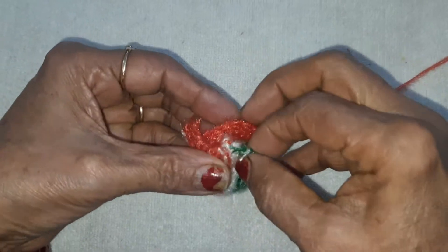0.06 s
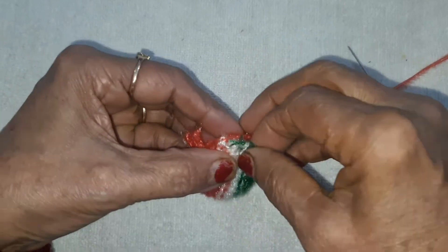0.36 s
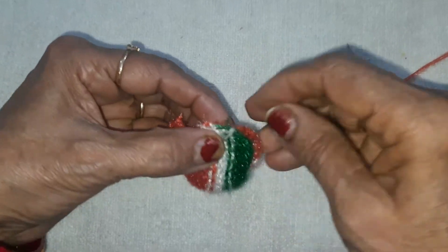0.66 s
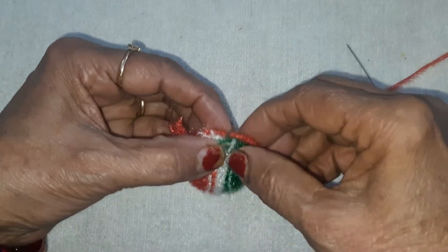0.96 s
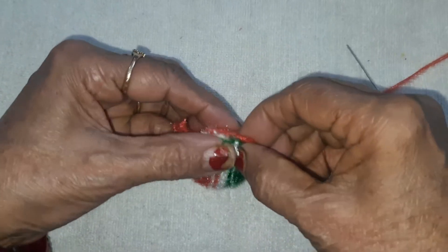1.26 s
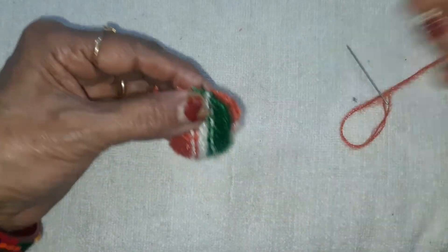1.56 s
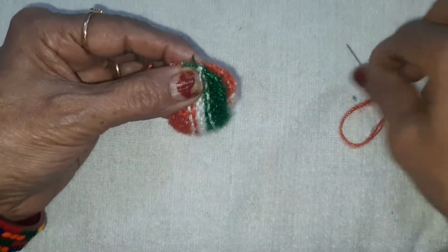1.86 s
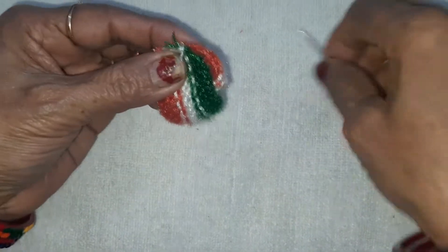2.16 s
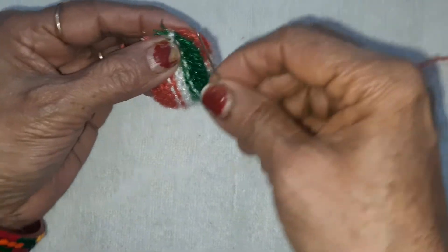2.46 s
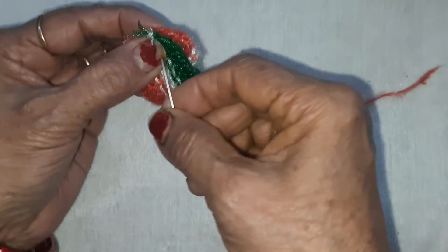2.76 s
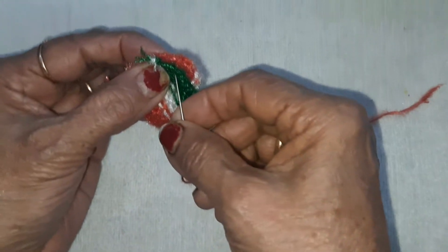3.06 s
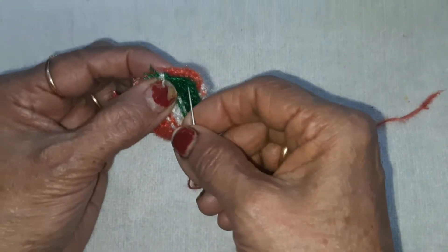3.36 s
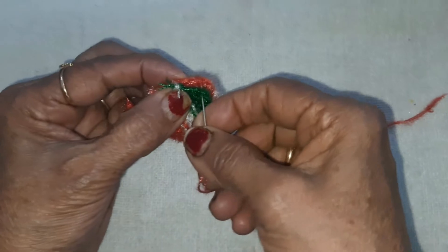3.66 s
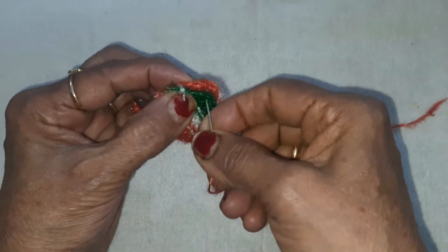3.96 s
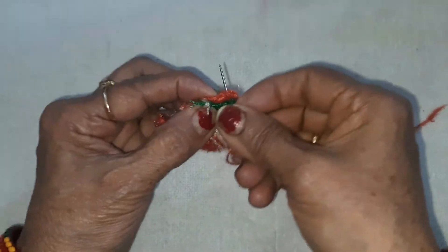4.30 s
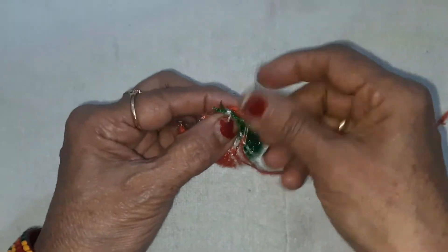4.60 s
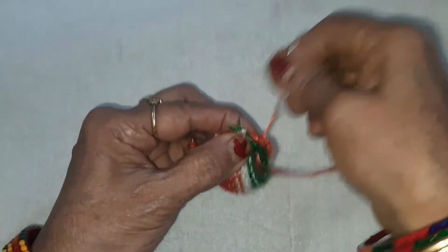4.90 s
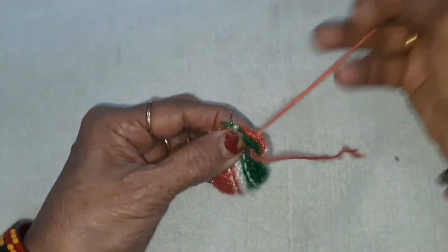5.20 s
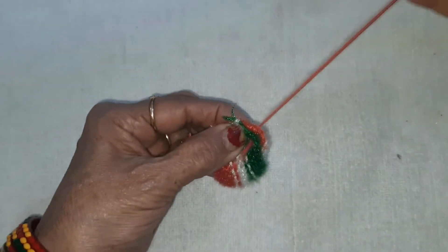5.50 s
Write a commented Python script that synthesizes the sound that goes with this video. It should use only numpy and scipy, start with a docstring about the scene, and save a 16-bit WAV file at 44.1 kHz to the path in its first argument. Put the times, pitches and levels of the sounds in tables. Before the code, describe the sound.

Glass bangles clink brightly on the wrists of someone sewing a small woollen piece, close to the microphone. Irregular clinks and short rattles come first, with forearms softly rubbing and bumping on a cloth-covered table. After a lull, yarn hisses through the wool and the bangles chatter again, including one hard, ringing clash that briefly overloads the microphone. A small room hums quietly underneath.

```python
"""Glass bangles clink and rattle on the wrists of hands sewing a small woollen piece in a small room.
Each touch is a brief crack and a bright ring of glass; one hard clash overloads the close microphone.
Yarn hisses through the wool, fingers brush, and forearms rub and bump on the cloth-covered table.
Underneath, the room hums, and a faint thin tone comes and goes for the first two seconds."""
import sys
import numpy as np
from scipy import signal
from scipy.fft import rfft, irfft, next_fast_len
from scipy.io import wavfile
from scipy.ndimage import uniform_filter1d, map_coordinates

SR = 44100
rng = np.random.default_rng(int(sys.argv[2]) if len(sys.argv) > 2 else 0)


def unload_wav(signal):
    """Save mono or channel-first audio to the path in sys.argv[1] as 16-bit WAV at rate SR, clipped to [-1, 1]."""
    wavfile.write(
        sys.argv[1],
        SR,
        np.round(np.clip(np.atleast_2d(signal).T, -1, 1) * 32767).astype(np.int16),
    )


N = 248724
TIME_S = np.arange(N) / SR


def amp(db):
    return 10 ** (np.asarray(db) / 20)


def unit_rms(x):
    return x / np.sqrt(np.mean(x ** 2) + 1e-20)


def along(points, hz):
    """Read (freq_hz, value) points on a log frequency axis."""
    freqs, values = np.transpose(points)
    return np.interp(np.log(hz + 1), np.log(freqs + 1), values)


def wobble(rate_hz):
    """A smooth random curve with rate_hz knots a second."""
    knots = rng.standard_normal(int(N * rate_hz / SR) + 4)
    return map_coordinates(knots, [TIME_S * rate_hz])


def swells(rows):
    """Bell-shaped humps of gain from (centre_s, width_s, level_db) rows."""
    return sum(amp(db) * np.exp(-2 * ((TIME_S - centre) / width) ** 2) for centre, width, db in rows)


def decay(t, t60):
    """An envelope that loses 60 dB in t60 seconds."""
    return np.exp(-np.log(1000) * t / t60)


def filtered(x, response):
    """Equalise x with a gain given as a function of frequency."""
    n = x.shape[-1]
    padded = next_fast_len(n + 8192)
    return irfft(rfft(x, padded) * response(np.fft.rfftfreq(padded, 1 / SR)), padded)[..., :n]


def panned(pan_db):
    """Left and right gains for a level difference; positive is left."""
    return amp(np.array([[.5], [-.5]]) * pan_db)


def noise(spectrum, correlation, pan):
    """Stereo noise with colour, width and pan set by frequency; its mono mix has rms 1."""
    def mid_side_gains(hz):
        angle = np.arccos(np.clip(along(correlation, hz), -1, 1)) / 2
        return amp(along(spectrum, hz)) * [np.cos(angle), np.sin(angle)]
    mid, side = filtered(rng.standard_normal((2, N)), mid_side_gains)
    pair = filtered(np.array([mid + side, mid - side]), lambda hz: panned(along(pan, hz)))
    return pair / np.std(pair.mean(0))


def add(track, start_s, sound):
    """Mix a stereo sound into the track."""
    part = track[:, max(round(start_s * SR), 0):][:, :sound.shape[1]]
    part += sound[:, :part.shape[1]]


# Colour of the room's air: freq_hz, gain_db
AIR_SPECTRUM = [(15, -52), (25, -18.5), (43, -9.5), (129, -2.5), (198, -10), (282, -9), (410, -13.5),
                (495, -15.5), (684, -17.5), (895, -20.5), (1710, -24), (3500, -29), (6000, -31),
                (8300, -27.5), (10300, -32.5), (13000, -27), (15500, -28.5)]
# How alike the air is left and right: freq_hz, correlation
AIR_CORRELATION = [(60, 0.41), (150, 0.77), (380, 0.16), (950, -0.036), (2380, 0.071), (5980, -0.24),
                   (15000, 0.07)]
# Balance of the air: freq_hz, pan_db
AIR_PAN = [(60, 0.5), (240, 0.5), (950, 1.5), (3770, 1), (15000, -1.5)]
# Steady hum tones: pitch_hz, level_db
HUM_TONES = [(98.5, -65), (699.8, -85)]


def room_tone():
    """A bed of bass-heavy hiss and hum, both drifting gently in level."""
    air = amp(-57.2 + .45 * wobble(5)) * noise(AIR_SPECTRUM, AIR_CORRELATION, AIR_PAN)
    hum = sum(amp(db + 1.8 * wobble(2.94)) * np.sin(2 * np.pi * hz * TIME_S + .5 * wobble(5.5))
              for hz, db in HUM_TONES)
    return air + hum * panned(1)


# Steady rub of the resting arms: time_s, relative_db
ARM_REST = [(0, -47.5), (2.05, -50.5), (2.25, -52.5), (3.1, -57), (3.4, -62.5), (5.64, -59)]
# An arm shifts on the table: centre_s, width_s, relative_db
ARM_SHIFTS = [(0.125, 0.084, -48.5), (0.52, 0.1, -46), (0.82, 0.098, -49.5), (1.37, 0.12, -45),
              (1.92, 0.18, -52.5), (2.67, 0.13, -47), (2.87, 0.061, -46.5), (3.04, 0.098, -45),
              (4.28, 0.15, -60)]
# Low rumble of the rub: freq_hz, gain_db
RUB_SPECTRUM = [(15, -47), (25, -25.5), (102, -0.5), (151, -6.5), (189, -16), (287, -15), (369, -26),
                (467, -26), (530, -56.5), (700, -29), (910, -73), (1540, -120)]
# Soft bumps on the table: start_s, relative_db
TABLE_BUMPS = [(0.699, -43.5), (1.956, -34), (1.969, -44), (2.663, -45)]
# Dull body of a bump: freq_hz, gain_db
THUD_SPECTRUM = [(60, -2), (130, 3), (230, -2), (360, 0), (500, -18), (1500, -34), (3000, -30), (8000, -69)]


def arms():
    """Forearms rub on the padded table, louder whenever they shift, and now and then bump it."""
    effort = amp(np.interp(TIME_S, *np.transpose(ARM_REST))) + swells(ARM_SHIFTS)
    rub = noise(RUB_SPECTRUM, correlation=[(30, 0.69), (100, 0.98), (500, 0.3)], pan=[(100, 5)])
    out = amp(-4) * effort * rub
    t = np.arange(SR // 5) / SR
    envelope = decay(t, 0.15) * (1 - np.exp(-t / 0.002))
    for start_s, db in TABLE_BUMPS:
        thud = filtered(rng.standard_normal(len(t)), lambda hz: amp(along(THUD_SPECTRUM, hz)))
        add(out, start_s, amp(db - 1) * panned(2) * unit_rms(thud) * envelope)
    return out


# Soft pulses of the thin tone: centre_s, level_db
TONE_PULSES = [(0.115, -73), (0.47, -73.5), (0.62, -75), (0.78, -76), (1.08, -82), (1.33, -71),
               (1.57, -74.5), (1.73, -75), (1.87, -71.5)]


def thin_tone(pitch_hz=2373, pulse_s=0.053, bed_db=-82, end_s=1.95):
    """A faint, wavering tone off to the left swells unevenly, lingers between pulses, then stops."""
    hz = pitch_hz + 4 * wobble(14)
    bed = amp(bed_db) * (TIME_S < end_s)
    pulses = swells([(centre_s, pulse_s, db) for centre_s, db in TONE_PULSES])
    return (bed + pulses) * np.sin(2 * np.pi * np.cumsum(hz) / SR) * panned(19)


# Finger brushes: centre_s, width_s, peak_hz, level_db
FINGER_BRUSHES = [(0.475, 0.13, 2240, -67), (1.452, 0.08, 1950, -69), (2.478, 0.064, 2130, -64.5),
                  (3.525, .1, 990, -71), (3.723, 0.15, 1440, -68.5), (4.492, 0.028, 1020, -63.5)]


def fingers():
    """Fingers brush skin and cloth, each pass a soft, dull swell of grainy noise."""
    out = np.zeros((2, N))
    for centre_s, width_s, hz, db in FINGER_BRUSHES:
        band = [(hz / 4, -35), (hz * 0.99, -6), (hz, 0), (hz * 0.86, -6), (hz * 3, -30)]
        out += swells([(centre_s, width_s, db)]) * noise(band, correlation=[(hz, .4)], pan=[(hz, 2)])
    grain = unit_rms(amp(2.7 * wobble(200)))
    return out * grain


# Yarn drawn through the wool: centre_s, width_s, level_db
YARN_STROKES = [(0.61, 0.049, -58.5), (1.425, .04, -56.5), (4.311, 0.029, -55), (4.342, 0.054, -57),
                (4.41, 0.05, -60.5), (4.593, 0.061, -59), (5.12, 0.34, -52.5)]
# Bright hiss of the fibres: freq_hz, gain_db
WOOL_SPECTRUM = [(1000, -14), (2000, -8), (4500, -9), (8000, 1.5), (12000, -2), (15500, 0.5)]


def wool():
    """Fibres catch and slip under each stroke, giving a grainy hiss."""
    grain = amp(2.4 * wobble(390))
    hiss = noise(WOOL_SPECTRUM, correlation=[(4000, 0.32)], pan=[(4000, 0.56)])
    return swells(YARN_STROKES) * unit_rms(grain * hiss)


# Ringing modes of a glass bangle: pitch_hz, relative_db, base_t60_s
GLASS_MODES = [(1512, -16, 0.035), (2895, -13, 0.051), (4139, -4, 0.079), (4344, 2.5, 0.038),
               (4680, -13, 0.13), (5370, -9, 0.017), (6470, -9, 0.042), (6700, -17.5, 0.052),
               (7445, -6.5, 0.052), (7890, -3.5, 0.07), (8322, -0.5, 0.039), (8760, -2, 0.043),
               (9290, -2, 0.023), (9950, -6, 0.024), (11100, -7.5, 0.031), (11800, -7, 0.039),
               (11940, -7.5, 0.019), (12544, -2, 0.044), (12870, -3, 0.028), (13340, 1.5, 0.026),
               (14020, -10.5, 0.023), (14700, 10, 0.023), (15300, -5.5, 0.028)]
# Crack of glass on glass: freq_hz, gain_db
CRACK_SPECTRUM = [(1000, -5), (3300, -13), (6000, -3.5), (8000, 5.5), (12000, -5.5), (15500, -3.5)]


def glass(colour, damping, crack_db, crack_t60, scatter_db, detune_hz):
    """One contact: a brief crack, and modes that reach each channel at their own strength and phase."""
    t = np.arange(SR // 14) / SR
    hz, db, t60 = np.transpose(GLASS_MODES)
    strength = amp(db + colour(hz) + scatter_db * rng.standard_normal((2, len(hz))))
    pitch = hz + detune_hz * rng.standard_normal(len(hz))  # no two bangles are quite alike
    phase = rng.uniform(0, 2 * np.pi, (2, len(hz)))
    modes = np.exp(2j * np.pi * pitch[:, None] * t) * decay(t, t60[:, None] / damping)
    ring = ((strength * np.exp(1j * phase)) @ modes).imag
    crack = filtered(rng.standard_normal((2, len(t))),
                     lambda f: amp(along(CRACK_SPECTRUM, f) + colour(f)))
    attack = 1 - np.exp(-t / 0.00012)
    return (ring + amp(crack_db) * crack * decay(t, crack_t60)) * attack


# Reverb time of the small room: freq_hz, t60_s
ROOM_DECAY = [(300, 0.63), (4000, 0.3), (8000, 0.28), (15000, 0.1)]


def in_room(sound, early_db, tail_db, early_t60):
    """Quick echoes off table and arms follow the direct sound, then the room's darkening tail."""
    hz, frame_s, bands = signal.stft(rng.standard_normal((2, SR // 3)), SR, nperseg=256)
    fade = amp(-60 * frame_s / along(ROOM_DECAY, hz)[:, None])
    tail = signal.istft(bands * fade, SR, nperseg=256)[1]
    t = np.arange(tail.shape[1]) / SR
    tail *= 1 - np.exp(-t / 0.013)
    early = rng.standard_normal(tail.shape) * decay(t, early_t60) * (t > .002)
    impulse = amp(early_db) * early / np.linalg.norm(early[0])
    impulse += amp(tail_db) * tail / np.linalg.norm(tail[0])
    impulse[:, 0] += 1  # direct sound
    return signal.fftconvolve(sound, impulse, axes=1)


def clink(level_db, lead_hz, top_db):
    """One clink in the room: harder contacts are brighter, and the place of touch favours one mode."""
    force_db = level_db + 34  # zero for a firm contact
    low_db, mid_db = -15 - 0.33 * force_db, -10.5 - 0.2 * force_db
    tilt = [(4900, low_db), (7000, mid_db), (9500, mid_db), (11000, 0), (13400, 0), (14200, top_db)]
    near_lead = lambda hz, width_hz: np.exp(-((hz - lead_hz) / width_hz) ** 2)
    colour = lambda hz: along(tilt, hz) + 12 * near_lead(hz, 450) - 2 * near_lead(hz, 1100)
    ring = glass(colour, damping=1.33, crack_db=4, crack_t60=0.03, scatter_db=4.5, detune_hz=24.1)
    sound = in_room(ring, early_db=0, tail_db=-8.5, early_t60=0.054)
    return amp(level_db) * sound / np.std(sound[:, :SR // 100])  # the first 10 ms set the level


# Bangle hits, with a shelf on the top octave's upper modes: start_s, level_db, lead_hz, top_db, pan_db
BANGLE_CLINKS = [(0.6729, -45, 8600, -9, -3), (0.6865, -40.5, 8400, 3, -2), (0.7146, -23, 8100, -9, 1),
                 (0.7542, -41, 4200, -16, 6), (0.821, -51.5, 4200, -13, 2), (0.983, -57.5, 4200, -16, 5),
                 (1.184, -49, 7650, -20, 2), (1.2146, -50.5, 8280, -18, 6), (1.5771, -41, 8050, -16, 3),
                 (1.6206, -32.5, 7600, -9, -3.5), (1.6362, -37, 7360, -12, -3), (1.7857, -30, 8570, -4, 6),
                 (1.8115, -35, 4260, -12, 1.5), (1.937, -30, 13000, -18, 3), (2.167, -51.5, 7700, -12, -2),
                 (2.2936, -31.5, 7940, -20, 2.5), (2.3238, -32.5, 8100, -18, 2.5),
                 (2.395, -43, 8370, -13, 4), (2.6439, -24.5, 8150, -12, 4), (2.6483, -29.5, 4120, -13, 3),
                 (2.6641, -30, 8310, -8, 0), (2.9662, -40, 8040, -8, 0), (4.2238, -56, 8000, -13, 0),
                 (4.6308, -41.5, 7460, -12.5, -4), (4.696, -36, 7430, -15, 0), (4.808, -24, 13290, -27, 2),
                 (4.9775, -26, 8440, -12, 0), (5.035, -28.5, 7640, -20, 2.5),
                 (5.1472, -34.5, 8200, -12, 1.5), (5.169, -36, 12770, -13, -1),
                 (5.2019, -24.5, 8340, -9, -1), (5.3229, -35.5, 8200, -19.5, -2),
                 (5.3467, -27, 7400, -11, -3), (5.3868, -41.5, 8050, -25, 1), (5.4097, -36, 7200, -18, -4),
                 (5.5718, -36, 8420, -21, 7.5), (5.5954, -36, 8900, -22, 1)]


def bangles(settle_s=0.08, settle_loss_db=20, fade_db_per_s=110):
    """Bangles clink as the yarn is drawn, each hit trailed by two faint, duller touches as they settle."""
    out = np.zeros((2, N))
    settle_delays = settle_s * rng.random((len(BANGLE_CLINKS), 2))
    for (start_s, db, lead_hz, top_db, pan_db), delays in zip(BANGLE_CLINKS, settle_delays):
        add(out, start_s, panned(pan_db) * clink(db, lead_hz, top_db))
        for delay in delays:
            touch_db = db - settle_loss_db - fade_db_per_s * delay
            add(out, start_s + delay, panned(pan_db) * clink(touch_db, lead_hz, top_db))
    return out


# Bursts of bangle chatter: start_s, length_s, relative_db
BANGLE_RATTLES = [(0.758, .015, -50), (1.59, 0.052, -47), (1.82, 0.032, -44), (4.65, 0.016, -37),
                  (4.99, 0.026, -42), (5.086, 0.048, -35), (5.351, 0.085, -40)]


def rattles(touches_per_s=130):
    """Bangles sliding along the arm touch many times at random, each touch a tightly damped tick."""
    out = np.zeros((2, N))
    colour = lambda hz: along([(4300, -10.5), (8000, -2.5), (12600, 8.5), (15000, -5)], hz)
    for start_s, length_s, db in BANGLE_RATTLES:
        for position, softness in rng.random((round(length_s * touches_per_s), 2)):
            ring = glass(colour, damping=4.7, crack_db=4, crack_t60=0.01, scatter_db=5.5, detune_hz=60)
            touch = in_room(ring, early_db=-2, tail_db=-2.5, early_t60=0.06)
            add(out, start_s + position * length_s, amp(db - 2.5 - 6.2 * softness) * touch)
    return out


# The hard clash and its rebounds: start_s, relative_db
CLASH_HITS = [(5.069, -8), (5.0714, 0.5), (5.0770, -3), (5.0783, 0)]
# How strongly the clash excites the glass: freq_hz, gain_db
CLASH_EXCITATION = [(1500, -27), (2870, -24), (4130, -23), (4400, -31), (5400, -16), (6500, -14),
                    (7500, -26), (8300, -20.5), (9500, -20), (11100, -14), (12100, -17), (12550, 0),
                    (12750, 0), (13300, -11), (14200, -19), (14800, -27), (15400, -24)]


def clash():
    """The arm jerks the yarn tight and the bangles slam together, ringing mostly in two high modes."""
    out = np.zeros((2, N))
    colour = lambda hz: along(CLASH_EXCITATION, hz)
    for start_s, db in CLASH_HITS:
        ring = glass(colour, damping=1.1, crack_db=-6, crack_t60=.018, scatter_db=.5, detune_hz=2)
        ring /= np.abs(ring).max(axis=1, keepdims=True)
        hit = in_room(ring, early_db=-24, tail_db=-16.5, early_t60=0.03)
        add(out, start_s, amp(db - 0.5) * panned(6) * hit)
    return out


def scene():
    """Bright glass up front, soft handling noise behind it, the room underneath."""
    glassware = bangles() + rattles() + clash()
    handling = arms() + wool() + fingers()
    return glassware + handling + room_tone() + thin_tone()


# Crackle of the overloaded microphone: freq_hz, gain_db
CRACKLE_SPECTRUM = [(100, -26.5), (300, -3.5), (600, -2.5), (1000, 2), (2200, 4.5), (3500, -3.5),
                    (15000, -4.5)]


def record(dry, crackle_threshold=0.45, cutoff_hz=15800):
    """The microphone clips at full scale, crackles while overloaded and loses the extreme treble."""
    clipped = np.clip(dry, -1, 1)
    overload = uniform_filter1d(np.clip(np.abs(dry) - crackle_threshold, 0, .5), 24, axis=1)
    crackle = filtered(rng.standard_normal(dry.shape), lambda hz: amp(along(CRACKLE_SPECTRUM, hz)))
    return filtered(clipped + 0.65 * overload * crackle, lambda hz: hz < cutoff_hz)


dry = scene()
out = record(dry)
unload_wav(out)
```